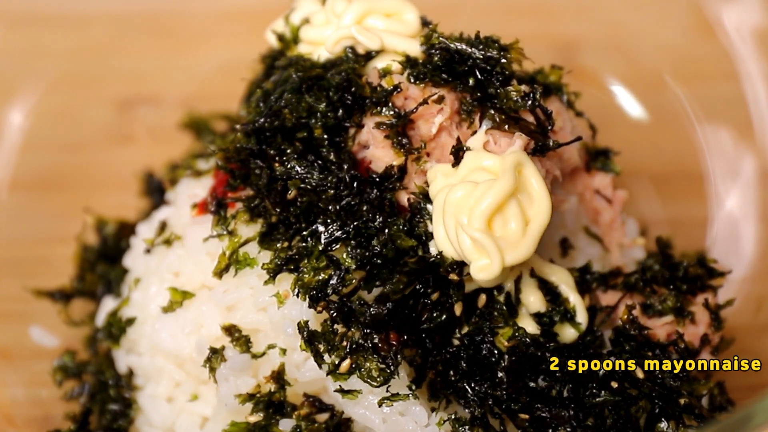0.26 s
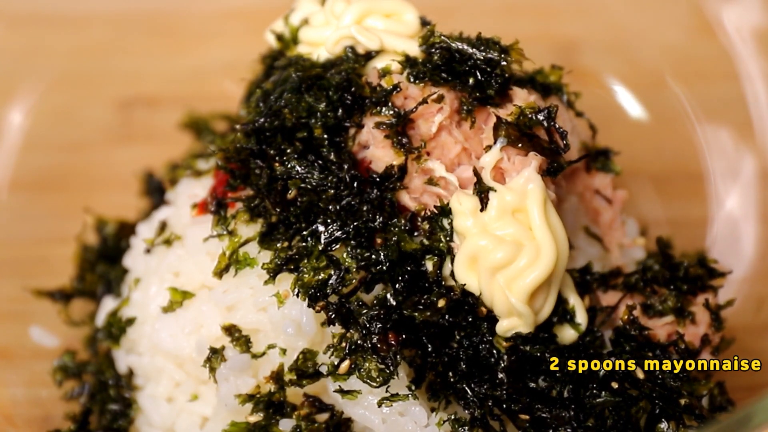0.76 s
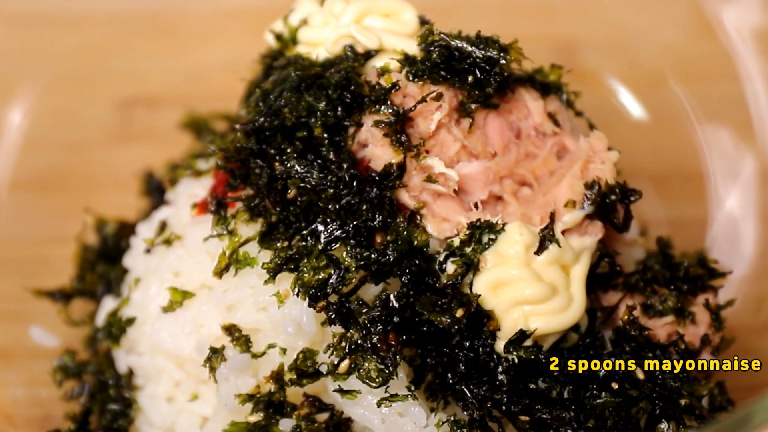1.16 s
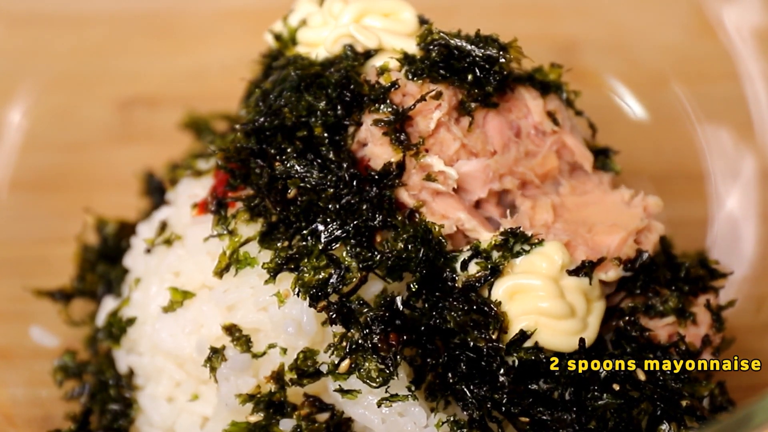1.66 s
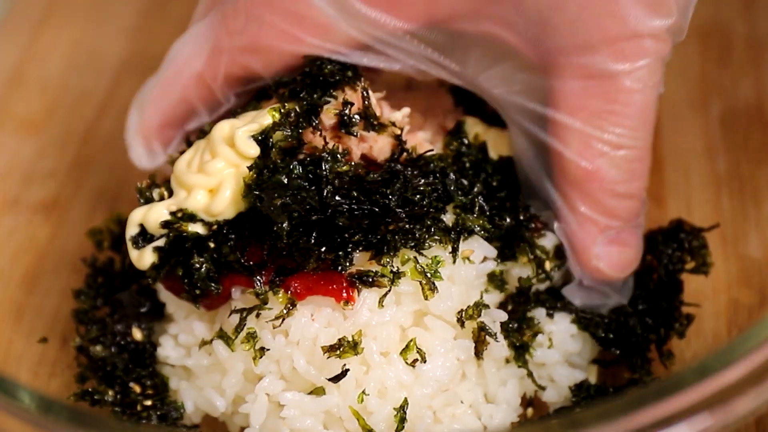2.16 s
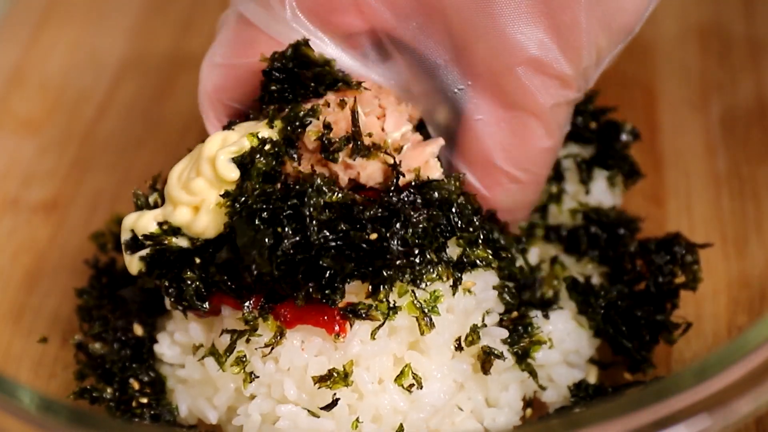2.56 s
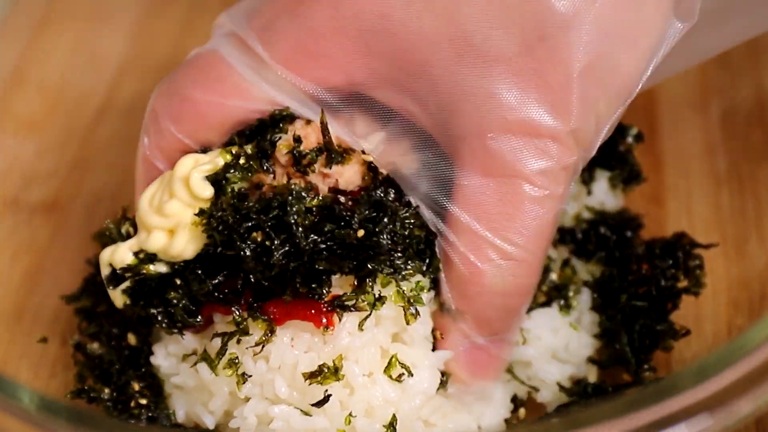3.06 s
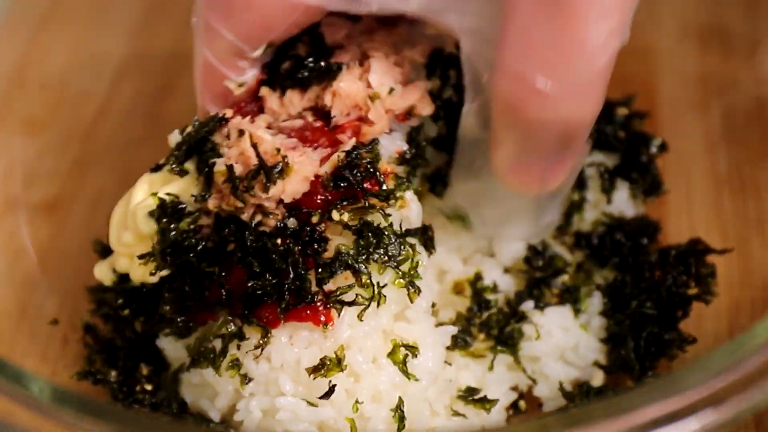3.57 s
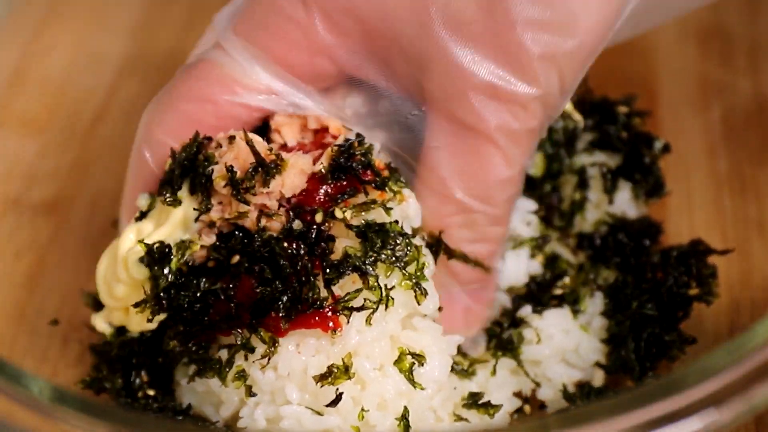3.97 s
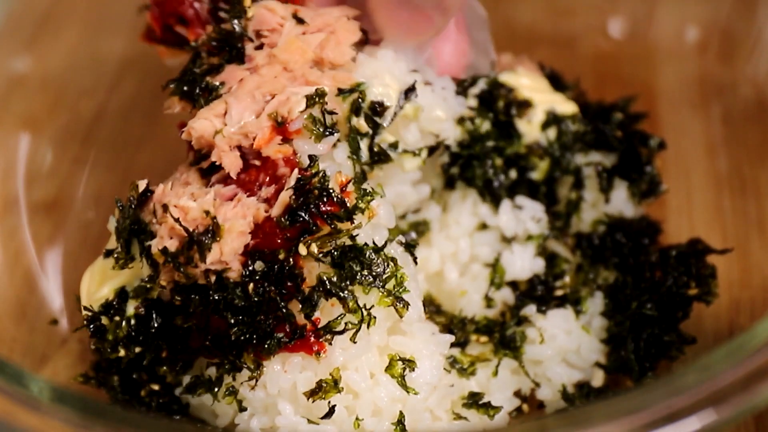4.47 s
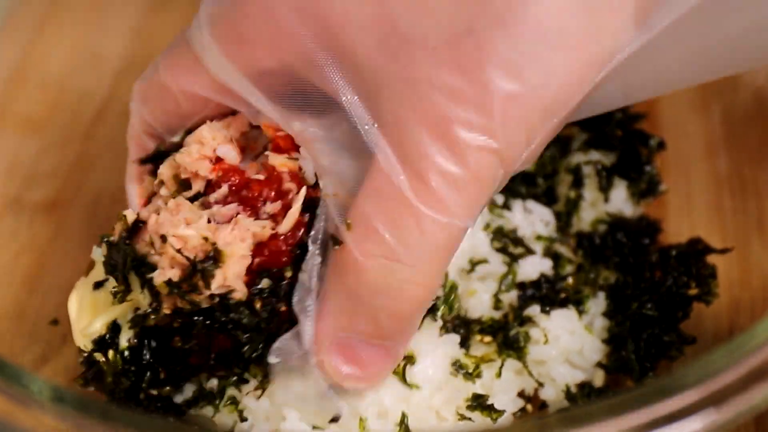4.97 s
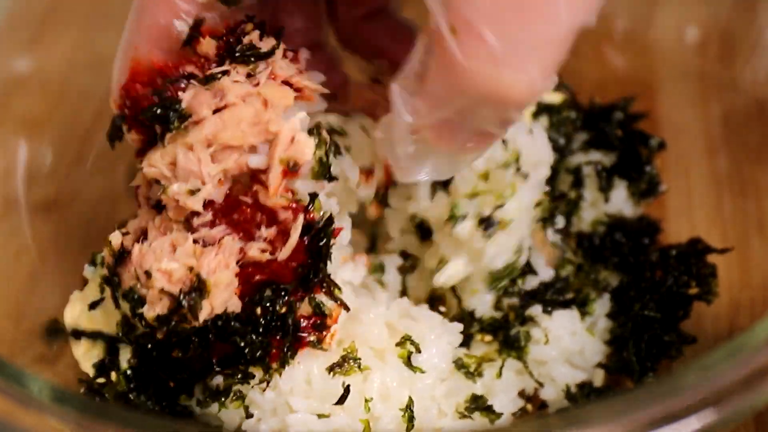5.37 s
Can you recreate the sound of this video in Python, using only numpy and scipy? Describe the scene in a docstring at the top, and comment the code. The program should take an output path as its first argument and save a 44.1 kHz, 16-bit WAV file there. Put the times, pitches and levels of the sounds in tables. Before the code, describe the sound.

A very quiet hiss with a few faint ticks lasts about a second and a half. Then a hand in a thin plastic glove presses into rice and dry seaweed in a glass bowl: dense bright crinkling, sharp snaps, soft squishes and small sticky smacks come in uneven squeezes until the end. Close microphone, thin sound without bass, slight kitchen echo.

```python
"""Hands in thin plastic gloves squeeze and turn sticky rice and seaweed flakes in a glass bowl, heard close up.
The film buckles in swarms of tiny damped clicks over fine noise, and in single sharp snaps that ring briefly.
Rice squishes and smacks underneath, with filtered noise for a hollow ring that grows as the hand closes.
Before the squeezing starts there is a noise hush with a few faint ticks, short puffs of noise around one pitch.
Faint echoes of bowl and kitchen follow the hands; a steep low cut leaves everything thin and bright."""
import sys
import numpy as np
from scipy import signal
from scipy.fft import rfft, irfft
from scipy.io import wavfile
from scipy.ndimage import uniform_filter1d

SR = 44100
rng = np.random.default_rng(int(sys.argv[2]) if len(sys.argv) > 2 else 0)


def master(y):
    """Save y as 16-bit WAV."""
    cut = np.clip(np.atleast_2d(y).T, -1, 1)
    pcm = np.round(cut * 32767)  # scale
    wavfile.write(sys.argv[1], SR, pcm.astype(np.int16))


N = 247401
TIME = np.arange(N) / SR

# Background levels over time, joined by straight lines: start_s, hiss_db, rumble_db
BACKGROUND_LEVELS = [(0, -54, -81), (1.36, -53.5, -82), (1.42, -56.5, -82), (1.62, -52, -84),
                     (1.7, -45.5, -86), (3.2, -47, -96), (3.95, -44.5, -102), (4.15, -45, -102),
                     (5.61, -38.5, -102)]
# The hush falls silent briefly: from_s, to_s
HUSH_GAP = (1.383, 1.411)
# Faint ticks and puffs before the squeezing starts: start_s, level_db, pitch_hz, width_octaves, decay_s
FAINT_TICKS = [(0.525, -39.5, 5260, 0.77, 0.0024), (0.537, -42, 4800, 1.1, 0.0027),
               (0.544, -51.5, 3870, 1.3, .035), (0.787, -54.5, 2620, 1.1, 0.015),
               (0.861, -55, 6500, 0.13, .005), (0.888, -59, 11600, .08, 0.033),
               (1.139, -52.5, 14600, 1.6, 0.006), (1.244, -54, 10000, 0.24, 0.013),
               (1.252, -50.5, 8740, 0.13, 0.031), (1.488, -55, 5000, 1.1, .003)]
# Presses of the fingers into the rice, levels before small trims: start_s, rise_s, hold_s,
# rice_squeeze_db, film_crinkle_db, film_slide_db,
# cupping (0 = flat on the dry flakes .. 1 = closed deep in the rice)
FINGER_PRESSES = [(1.609, .02, .01, -63, -51.5, -62, 0.54), (1.641, .008, 0.05, -57, -43.5, -55, 0.44),
                  (1.701, 0.012, 0.025, -38.5, -24, -24.5, 0.077),
                  (1.721, 0.011, 0.0061, -30.5, -34, -30, 0.25),
                  (1.778, 0.041, 0.055, -36, -33.5, -35, 0.1),
                  (1.898, 0.023, 0.065, -36.5, -36.5, -46, .05),
                  (2.007, 0.019, 0.077, -36.5, -30, -35.5, 0.069),
                  (2.106, 0.038, 0.065, -40, -40, -54, 0.14), (2.191, 0.035, 0.086, -36, -33, -40.5, 0.032),
                  (2.308, 0.037, 0.18, -41, -31, -41, 0.043),
                  (2.499, 0.011, 0.083, -31, -30.5, -35.5, 0.19),
                  (2.676, 0.069, 0.028, -38, -36, -47.5, 0.3), (2.77, 0.055, .15, -39, -30.5, -44, 0.32),
                  (2.959, 0.078, 0.083, -39.5, -34, -44, .05), (3.168, 0.051, 0.059, -49.5, -37, -49, 0.48),
                  (3.249, 0.048, 0.085, -43, -36, -52, 0.54), (3.338, .015, 0.022, -43, -45.5, -53, 0.59),
                  (3.527, 0.032, .025, -36, -32.5, -40, 0.5), (3.601, 0.028, 0.06, -51, -32.5, -48, 0.59),
                  (3.658, 0.043, 0.066, -32.5, -30, -44, 0.17), (3.737, 0.047, 0.11, -32, -28.5, -40, 0.13),
                  (3.98, 0.031, 0.055, -40, -30, -47, 0.51), (4.035, 0.038, .03, -39, -31.5, -35, 0.7),
                  (4.119, .01, 0.013, -44, -34, -51, 0.52), (4.215, 0.017, 0.068, -52, -34, -46, 0.57),
                  (4.315, 0.048, 0.014, -44.5, -33, -51, 1), (4.396, 0.0055, 0.032, -31, -25.5, -34, 0.51),
                  (4.442, 0.019, 0.041, -39, -31.5, -39.5, 0.055),
                  (4.52, 0.072, 0.011, -51, -31.5, -44, 0.87), (4.687, 0.017, 0.089, -41, -33, -45, 0.86),
                  (4.797, 0.065, 0.049, -44, -36.5, -39.5, 0.6),
                  (4.919, 0.01, 0.014, -51, -42.5, -44.5, 0.83),
                  (5.071, 0.01, 0.0092, -43.5, -40.5, -49, 0.75),
                  (5.118, 0.022, 0.012, -69, -39, -45.5, 0.72), (5.304, 0.004, 0.029, -35, -35, -46, 0.48),
                  (5.37, 0.029, 0.02, -36.5, -34, -37.5, 0.53), (5.431, 0.022, 0.044, -41.5, -36.5, -54, 1),
                  (5.566, 0.023, 0.035, -49.5, -43, -44.5, 1)]
# The hand resting on the rice between presses, at touchdown: rice_squeeze_db, film_crinkle_db, film_slide_db
RESTING_LEVELS = (-47.5, -41.5, -49.5)
# Placed snaps of folding film, most of them strong, level before a shared trim:
# peak_s, level_db, pitch_hz, length_ms
PLACED_SNAPS = [(1.692, -16, 6400, .5), (1.6943, -10.5, 5800, 0.48), (1.712, -7, 5140, 0.45),
                (1.7568, -10, 5240, 1), (1.7905, -2, 7100, 0.15), (1.801, -2, 7500, 0.17),
                (1.8456, -7, 6900, 0.18), (1.9, -2, 7400, 0.13), (2.25, -8, 6950, 0.15),
                (2.2653, -3.5, 7400, 0.29), (2.4826, -6, 8400, 0.2), (2.5155, -9.5, 7500, .6),
                (2.585, -8.5, 6650, .18), (2.612, -2, 7240, 0.26), (2.7938, -8.5, 5030, 0.46),
                (2.9353, -3.5, 7170, 0.34), (3.005, -3.5, 6700, 0.16), (3.0416, -9, 7700, .27),
                (3.0855, -6.5, 8660, 0.4), (3.0923, -0.5, 7100, 0.18), (3.4859, -12.5, 6700, 0.22),
                (3.5324, -12, 5730, 0.5), (3.635, -9.5, 7440, 0.24), (3.6816, -3.5, 6400, 0.24),
                (3.894, -11.5, 7040, 0.5), (3.9915, -15, 6450, 0.35), (4.0686, -10.5, 5800, .5),
                (4.151, -12, 5470, .49), (4.181, -9, 8800, 0.11), (4.205, -9, 6300, 0.2),
                (4.34, -15.5, 5450, 0.5), (4.4028, -6.5, 7300, 0.44), (4.4183, -3.5, 5450, 0.48),
                (4.4274, -6.5, 5370, 0.26), (4.454, -11.5, 4360, .65), (4.5334, 0, 7450, 0.34),
                (4.595, -5, 6850, 0.35), (4.803, -9, 5770, 0.15), (4.912, -3, 8100, 0.25),
                (5.1171, -18, 5970, .14), (5.404, -7.5, 5530, 0.15)]
# Placed wet smacks, most of them strong, plus two faint low hollow bumps, level before a shared trim:
# peak_s, level_db, pitch_hz
PLACED_SMACKS = [(1.881, -15.5, 1990), (2.2095, -14.5, 2050), (2.291, -13.5, 2660), (2.3618, -15, 2180),
                 (2.3735, -14.5, 2400), (2.402, -14, 2430), (2.4453, -14, 2300), (2.5517, -11, 2150),
                 (2.5802, -14.5, 2250), (3.0545, -14, 2530), (3.0932, -10.5, 3350), (3.1083, -16, 2250),
                 (3.116, -15, 2220), (3.2182, -18.5, 2250), (3.306, -26.5, 1300), (3.6991, -10, 1940),
                 (3.8389, -15, 2310), (4.402, -17, 1680), (4.5066, -15, 2400), (4.9028, -16, 1890),
                 (4.947, -29, 1230), (5.3158, -16, 1860), (5.3863, -19, 1750), (5.51, -20, 1690)]

# All sound colours below have the columns pitch_hz, density_db (per Hz); only the shape counts.
# Background hiss: pitch_hz, density_db
HISS_COLOUR = [(600, 15), (1100, 0.5), (1400, 2.5), (1800, -0.5), (3000, -1), (5000, -4), (8500, -7),
               (11000, -8.5), (15000, 0), (16000, -22.5)]
# Faint rumble of changing level: pitch_hz, density_db
RUMBLE_COLOUR = [(15, -6.5), (33, -4), (55, -5), (80, -21.5), (120, -24), (170, -23.5), (500, -44),
                 (1000, -52)]
# Even low noise floor: pitch_hz, density_db
LOW_FLOOR_COLOUR = [(30, -5.5), (90, 2.5), (160, -4), (300, -2), (450, 1), (620, -3), (1200, -23.5)]
# Squishing rice under the open hand: pitch_hz, density_db
RICE_OPEN = [(700, -15), (940, -38), (1050, -11.5), (1300, -7.5), (1600, -2.5), (2300, -1.5), (2750, -8),
             (3200, -11), (6000, -39.5)]
# Squishing rice under the cupped hand: pitch_hz, density_db
RICE_CLOSED = [(700, -27), (940, -19), (1050, -18), (1370, -9), (1600, -0.5), (1820, 2), (2050, -2),
               (2350, -3), (2650, -19), (3600, -17.5), (6000, -25)]
# Crunching seaweed flakes: pitch_hz, density_db
FLAKES_COLOUR = [(1500, -22), (2400, -1), (2900, 3), (3550, -5.5), (4300, -0.5), (5200, -15.5), (7000, -7)]
# Crinkling film on the open hand: pitch_hz, density_db
FILM_OPEN = [(1500, -26), (3000, -25), (3750, -11), (4250, -3), (5200, 1), (6200, -2), (7500, -3.5),
             (8800, -6), (9500, -8.5), (10100, -25.5), (16000, -33)]
# Crinkling film on the cupped hand: pitch_hz, density_db
FILM_CLOSED = [(1500, -33.5), (3700, -22), (4650, -16), (5050, -6), (6200, -5.5), (7000, -4.5), (7450, -4),
               (7900, -8), (9400, -13), (9900, -27), (16000, -22.5)]
# Film sliding: pitch_hz, density_db
SLIDE_COLOUR = [(3000, -16), (7000, 3.5), (10000, -2), (11500, -2), (13500, 1), (16000, -4)]

SAG_DB_PER_S, RELEASE_S = 17, 0.036  # a press eases a little while held, then dies away
# the resting rustle fades in up to the touch, and calms as the glove gets wet
TOUCH_S, APPROACH_DB_PER_S, SETTLE_DB_PER_S = 1.72, 230, 1.5
RESTING_CUP, DIG_PER_S = 0.29, 0.12  # cupping of the resting hand, which sinks deeper as the mixing goes on
SMOOTH_SHARE = 0.17  # share of smooth rubbing noise in the power of a swarm
FLAKES_CUPPED_DB = -20  # change of the flakes under the fully closed hand
# the hollow's base level, its gain when cupped, and its dB per dB of squeeze
HOLLOW_DB, HOLLOW_CUPPED_DB, HOLLOW_FOLLOW = -47.5, 15.5, 0.41
STRAY_DB, STRAY_SPREAD_DB = 11, 10.5  # small snaps over the crinkle, and how far the largest stand out
KITCHEN_DB, KITCHEN_T60_S = -21, 0.43  # echo level against the hands, and time to fall by 60 dB
LOW_CUT_HZ, STEP_HZ, STEP_DB = 900, 1020, -13  # the low cut, and a sharp step down below STEP_HZ
EDGE_HZ = 16000  # top of the sound band


def amp(db):
    """Decibels to gain."""
    return 10 ** (np.asarray(db) / 20)


def unit(x):
    """Scales to an average (rms) strength of 1."""
    return x / np.sqrt(np.mean(x ** 2) + 1e-20)


def add(mix, s, sound):
    """Mixes a sound in at time s."""
    part = mix[max(round(s * SR), 0):][:len(sound)]
    part += sound[:len(part)]


def curves(rows):
    """Joins rows (start_s, value, ..) by straight lines, one curve a column."""
    s, *columns = np.transpose(rows)
    return [np.interp(TIME, s, column) for column in columns]


def colour(x, spectrum, size=2048):
    """Shapes x with a filter that never acts ahead of time, so clicks keep their sharp front; rms 1."""
    hz, db = np.transpose(spectrum)
    filter_hz = abs(np.fft.fftfreq(size, 1 / SR)) + 1
    log_gain = np.log(amp(np.interp(np.log(filter_hz), np.log(hz), db)))
    minimum_phase = np.exp(np.conj(signal.hilbert(log_gain)))
    taps = np.fft.ifft(minimum_phase).real[:size // 2]
    return unit(signal.oaconvolve(x, taps)[:N])


def hiss():
    """Shaped noise, nearly even at first, dipping, then rising quickly as the hands touch down."""
    return colour(rng.standard_normal(N), HISS_COLOUR) * amp(curves(BACKGROUND_LEVELS)[0])


def rumble():
    """Very faint low noise: one part changes level, the other stays even."""
    changing = colour(rng.standard_normal(N), RUMBLE_COLOUR, size=16384) * amp(curves(BACKGROUND_LEVELS)[1])
    even = colour(rng.standard_normal(N), LOW_FLOOR_COLOUR) * amp(-95.5)
    return changing + even


def ticks(size=8192):
    """Short puffs of noise around one pitch, each dying away."""
    out = np.zeros(N)
    t = np.arange(size) / SR
    f = np.fft.rfftfreq(size, 1 / SR)
    for s, db, hz, octaves, decay_s in FAINT_TICKS:
        band = np.exp(-0.5 * (np.log2((f + 1) / hz) / octaves) ** 2)
        puff = unit(irfft(rfft(rng.standard_normal(size)) * band))
        add(out, s, amp(db) * puff * np.exp(-t / decay_s))
    return out


def contact_db():
    """The hand comes down on the rice and stays there."""
    return APPROACH_DB_PER_S * np.minimum(TIME - TOUCH_S, 0)


def pressing():
    """Each press rises, holds and lets go over the resting rustle: levels of rice, film, slide; cupping."""
    since_touch = TIME - TOUCH_S
    resting_db = np.array(RESTING_LEVELS)[:, None] + contact_db() - SETTLE_DB_PER_S * since_touch
    power = amp(resting_db) ** 2
    # cupping is averaged by film power, so the strongest press counts most for the shape of the hand
    cupping = power[1] * (RESTING_CUP + DIG_PER_S * since_touch)
    t = np.arange(SR // 2) / SR
    for s, rise_s, hold_s, rice_db, film_db, slide_db, cup in FINGER_PRESSES:
        held = np.maximum(t - rise_s, 0)
        release = np.exp(-np.maximum(held - hold_s, 0) / RELEASE_S)
        shape = np.minimum(t / rise_s, 1) * amp(-SAG_DB_PER_S * held) * release
        for layer, db in zip(power, (rice_db, film_db, slide_db)):
            add(layer, s, (amp(db) * shape) ** 2)
        add(cupping, s, cup * (amp(film_db) * shape) ** 2)
    return *(10 * np.log10(power)), np.clip(cupping / power[1], 0, 1)


def click(hz, rise_s, phase, size=256):
    """A few cycles of a small, heavily damped patch; its envelope peaks at 1 after rise_s."""
    t = np.arange(size) / SR
    u = t / rise_s
    return u ** 2 * np.exp(2 - 2 * u) * np.cos(2 * np.pi * hz * (t - rise_s) + phase)


def steady(x, size=2200):
    """Keeps the fast grain of x but evens out its slow level; rms 1."""
    slow_power = abs(uniform_filter1d(unit(x) ** 2, size))
    return unit(x / np.sqrt(slow_power + 0.05))


def swarm(lo_hz, hi_hz, per_s, spread_db, rise_cycles, count=30):
    """Many patches click at random moments and strengths, over the fine noise of rubbing."""
    out = np.zeros(N)
    for hz in np.geomspace(lo_hz, hi_hz, count):
        chance = rng.random(N)
        size = np.minimum(rng.exponential(1, N), 4)
        train = (chance < per_s / count / SR) * amp(spread_db * size)
        patch = click(hz, rise_cycles / hz, rng.uniform(0, 2 * np.pi))
        out += hz ** 1.5 * signal.oaconvolve(train, patch)[:N]
    rubbing = rng.standard_normal(N)
    return np.sqrt(1 - SMOOTH_SHARE) * steady(out) + np.sqrt(SMOOTH_SHARE) * rubbing


def cupped(x, open_spectrum, closed_spectrum, cup):
    """The closing hand shifts the colour from one spectrum to the other."""
    return (1 - cup) * colour(x, open_spectrum) + cup * colour(x, closed_spectrum)


def stick_slip(rate_hz, depth_db):
    """The grip catches and lets go irregularly: a fluttering gain."""
    slow_pass = signal.butter(2, rate_hz, fs=SR, output="sos")
    jerks = signal.sosfilt(slow_pass, rng.standard_normal(N))
    return steady(amp(depth_db * unit(jerks)), size=4400)


def kneading(squeeze_db, crinkle_db, slide_db, cup):
    """Rice, flakes and film follow the same jerky grip; the dry flakes crunch most under the open hand."""
    squish = swarm(1147, 3750, per_s=1200, spread_db=1.0, rise_cycles=0.85)
    rice = cupped(squish, RICE_OPEN, RICE_CLOSED, cup) * amp(squeeze_db + 0.03)
    crush = swarm(2550, 7000, per_s=1000, spread_db=2.5, rise_cycles=0.71)
    flakes_db = (squeeze_db + crinkle_db) / 2 + FLAKES_CUPPED_DB * cup
    flakes = colour(crush, FLAKES_COLOUR) * amp(flakes_db)
    crinkle = swarm(3790, 11150, per_s=2000, spread_db=1.5, rise_cycles=0.86)
    film = cupped(crinkle, FILM_OPEN, FILM_CLOSED, cup) * amp(crinkle_db + 0.43)
    rub = swarm(11000, 17000, per_s=1600, spread_db=-1.0, rise_cycles=0.36)
    slide = colour(rub, SLIDE_COLOUR) * amp(slide_db + 1.56)
    return (rice + flakes + film + slide) * stick_slip(rate_hz=59, depth_db=1.5)


def patchy(x, depth_db=1.5, size=512):
    """Different folds and clumps sound in turn: bands a few hundred Hz wide swell for some 30 ms."""
    overlap = size * 3 // 4
    z = signal.stft(x, SR, nperseg=size, noverlap=overlap)[2]
    across_pitch = uniform_filter1d(rng.standard_normal(z.shape), size=5, axis=0)
    patches = uniform_filter1d(across_pitch, size=10, axis=1)
    gain = unit(amp(depth_db * unit(patches)))
    return signal.istft(z * gain, SR, nperseg=size, noverlap=overlap)[1][:N]


def hollow(squeeze_db, cup, hz=1075, width_hz=160):
    """The air between hand and bowl: ringing noise that follows the squeeze and grows as the hand closes."""
    resonance = signal.iirpeak(hz, hz / width_hz, fs=SR)
    ring = rng.standard_normal(N)
    for _ in range(2):
        ring = signal.lfilter(*resonance, ring)
    level_db = HOLLOW_DB + HOLLOW_FOLLOW * squeeze_db + HOLLOW_CUPPED_DB * cup + contact_db()
    return unit(ring) * amp(level_db)


def strays(level_db, over_db, spread_db, hz, octaves, count):
    """Chance events, mostly small, scaled by the press under them: rows (peak_s, level_db, pitch_hz)."""
    when, strength, pitch = rng.random((count, 3)).T
    s = TOUCH_S + (TIME[-1] - TOUCH_S) * (np.arange(count) + when) / count
    db = np.interp(s, TIME, level_db) + over_db + spread_db * strength ** 2
    return np.transpose([s, db, hz * 2 ** (octaves * (2 * pitch - 1))])


def snaps(crinkle_db, small_ms=0.22, rise_share=0.69, crack_db=-11, crack_hz=11500,
          shiver_db=-16, strain_s=0.00012, shiver_s=0.00074, size=512):
    """A fold flips with a bright crack and rings; the film shivers as it strains and just after."""
    out = np.zeros(N)
    t = (np.arange(size) - size // 2) / SR
    capped_db = np.minimum(crinkle_db, -31)
    chance_snaps = strays(capped_db, STRAY_DB, STRAY_SPREAD_DB, hz=6440, octaves=0.57, count=150)
    small = [(*row, small_ms) for row in chance_snaps]
    for s, db, hz, length_ms in PLACED_SNAPS + small:
        rise_s = rise_share * length_ms / 1000
        phase = rng.uniform(0, 2 * np.pi)
        crack = amp(crack_db) * click(crack_hz, 0.31 / crack_hz, phase, size)
        add(out, s - rise_s, amp(db) * (click(hz, rise_s, phase, size) + crack))
        resonance = signal.iirpeak(min(hz, SR / 3), 2.2, fs=SR)
        ringing = unit(signal.lfilter(*resonance, rng.standard_normal(size)))
        shiver = ringing * np.exp(np.minimum(t / strain_s, -t / shiver_s))
        add(out, s + t[0], amp(db + shiver_db) * shiver)
    return amp(-2.8) * out


def smacks(squeeze_db, rise_cycles=1.2, tack_db=-6, tack_hz=4800, size=512):
    """Starch lets go with a tiny tack, and the air pocket that opens rings for a few cycles."""
    out = np.zeros(N)
    capped_db = np.minimum(squeeze_db, -37)
    chance_smacks = strays(capped_db, over_db=7.5, spread_db=6.5, hz=2030, octaves=0.16, count=50)
    for s, db, hz in PLACED_SMACKS + list(chance_smacks):
        rise_s = rise_cycles / hz
        phase = rng.uniform(0, 2 * np.pi)
        tack = amp(tack_db) * click(tack_hz, 0.5 / tack_hz, phase, size)
        add(out, s - rise_s, amp(db) * (click(hz, rise_s, phase, size) + tack))
    return amp(-3.5) * out


def reflections(x, delay_s, t60, size=12000):
    """A dense train of echoes that dies away; total echo energy 1."""
    t = np.arange(size) / SR
    taps = rng.standard_normal(size) * (t > delay_s) * np.exp(-np.log(1000) * t / t60)
    return signal.oaconvolve(x, taps / np.linalg.norm(taps))[:N]


def scene():
    """The background hush, the hands, and their echoes from the bowl and the kitchen."""
    hush = hiss() + ticks()
    hush *= (TIME < HUSH_GAP[0]) | (TIME > HUSH_GAP[1])
    squeeze_db, crinkle_db, slide_db, cup = pressing()
    rustle = patchy(kneading(squeeze_db, crinkle_db, slide_db, cup))
    hands = rustle + snaps(crinkle_db) + smacks(squeeze_db)
    bowl = amp(-16) * reflections(hands, delay_s=0.0007, t60=0.02)
    kitchen = amp(KITCHEN_DB) * reflections(hands, delay_s=0.009, t60=KITCHEN_T60_S)
    return (hands + bowl + kitchen + hollow(squeeze_db, cup) + hush)[None]


def record(dry):
    """A steep low cut with a sharp step near its edge, a very faint rumble beneath, then the band limit."""
    low_cut = signal.butter(N=12, Wn=LOW_CUT_HZ, btype="high", fs=SR, output="sos")
    cut = signal.sosfilt(low_cut, dry)
    step = signal.firwin(1023, STEP_HZ, pass_zero=False, fs=SR)
    above = signal.oaconvolve(cut, step[None], "same")
    thin = above + amp(STEP_DB) * (cut - above)
    band_limit = signal.firwin(511, EDGE_HZ, window=("kaiser", 9), fs=SR)
    return signal.oaconvolve(thin + rumble(), band_limit[None], "same")


dry = scene()
out = record(dry)
master(out)
```